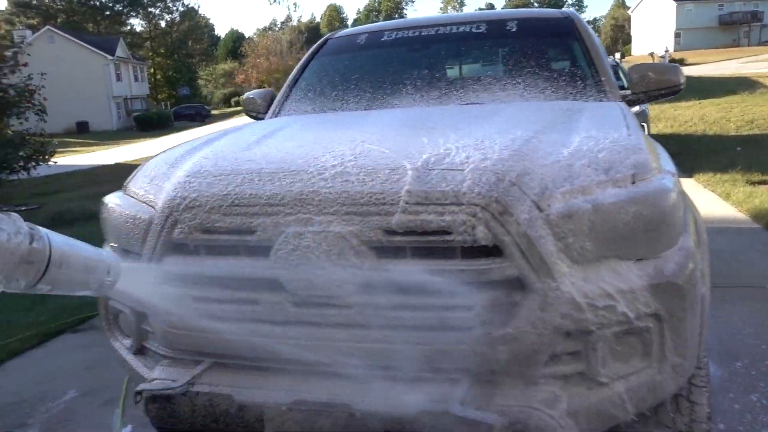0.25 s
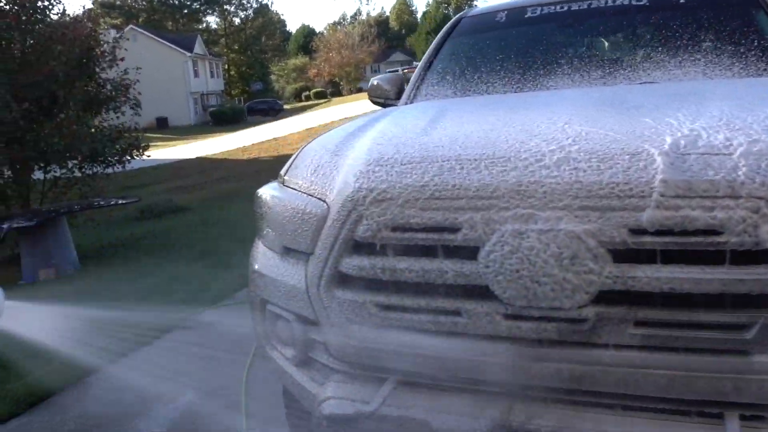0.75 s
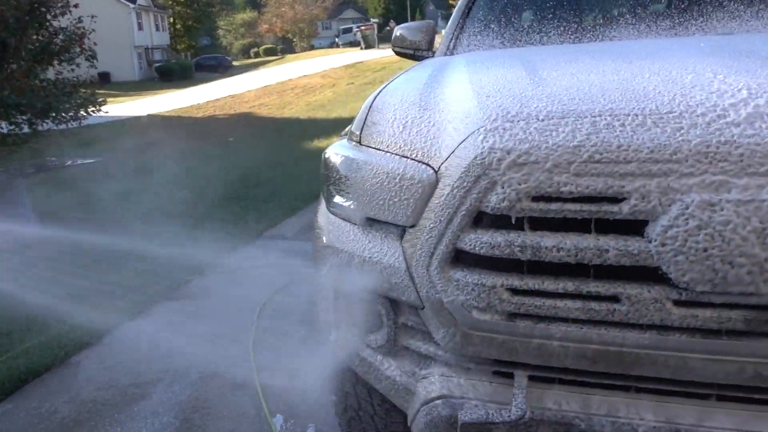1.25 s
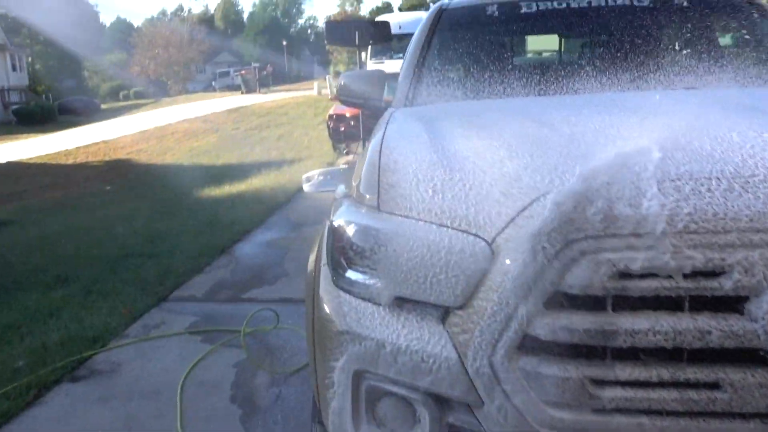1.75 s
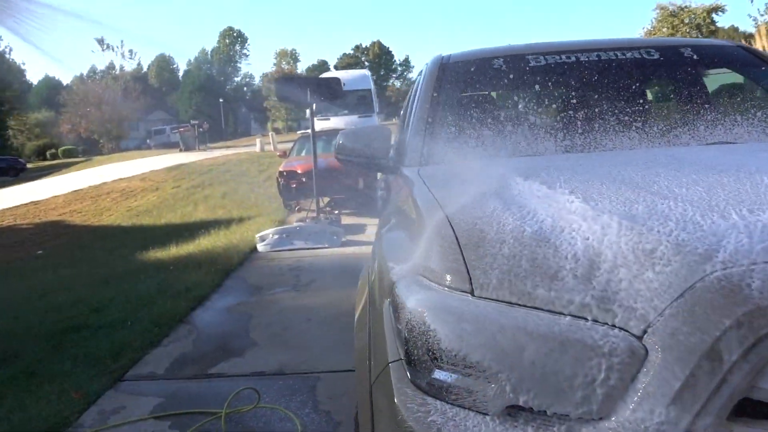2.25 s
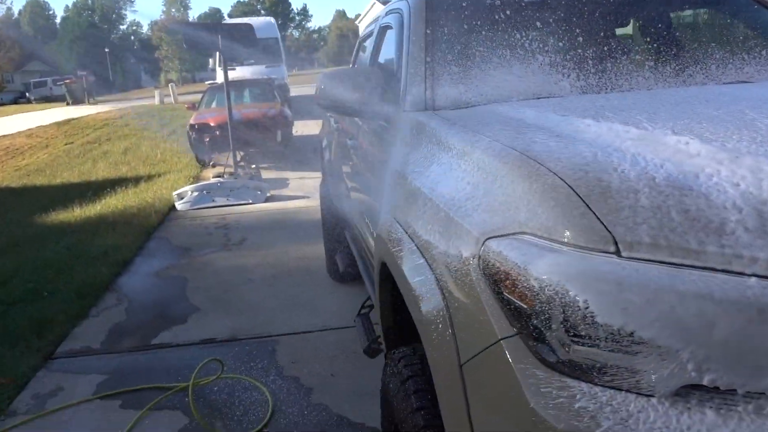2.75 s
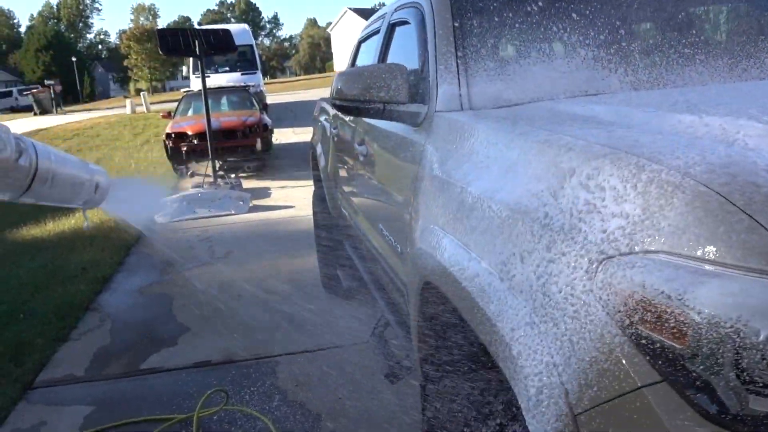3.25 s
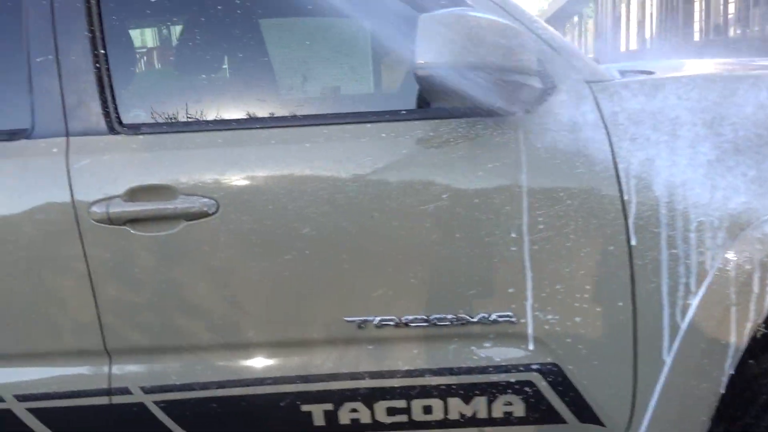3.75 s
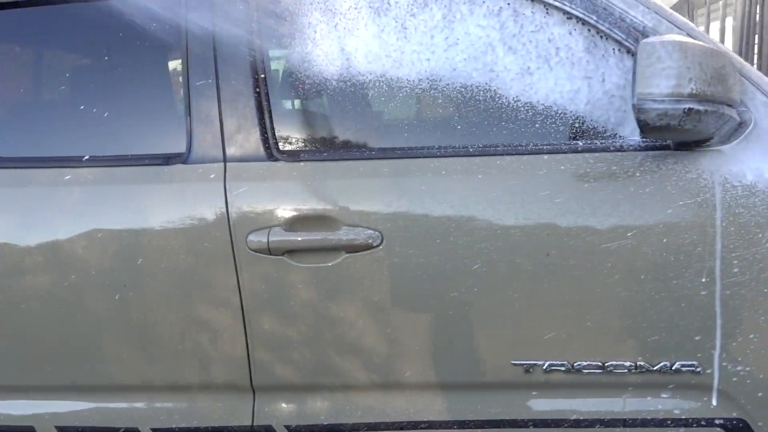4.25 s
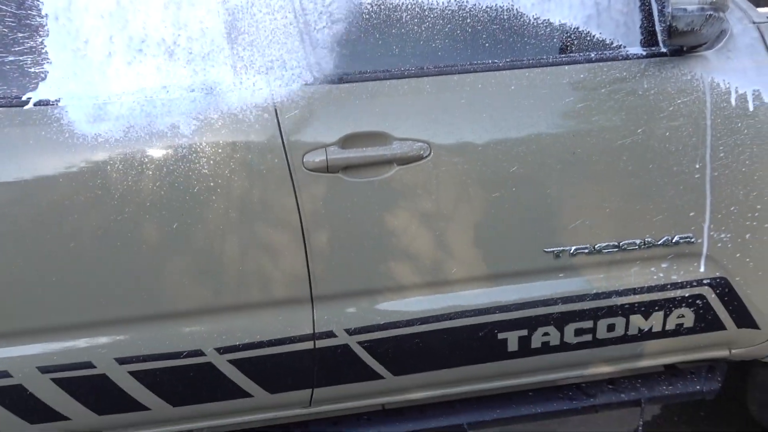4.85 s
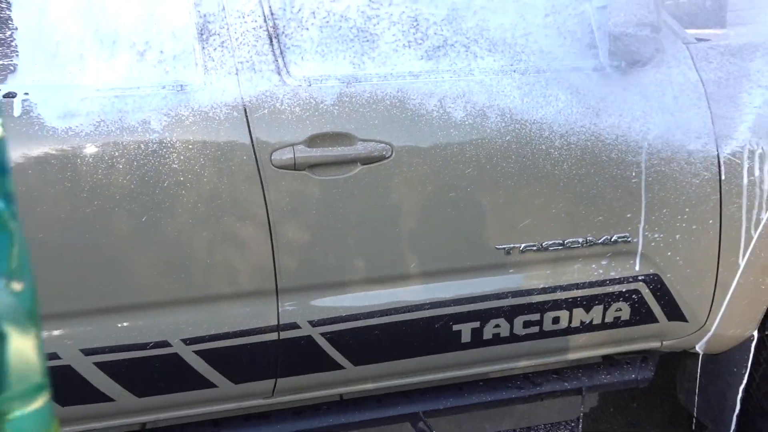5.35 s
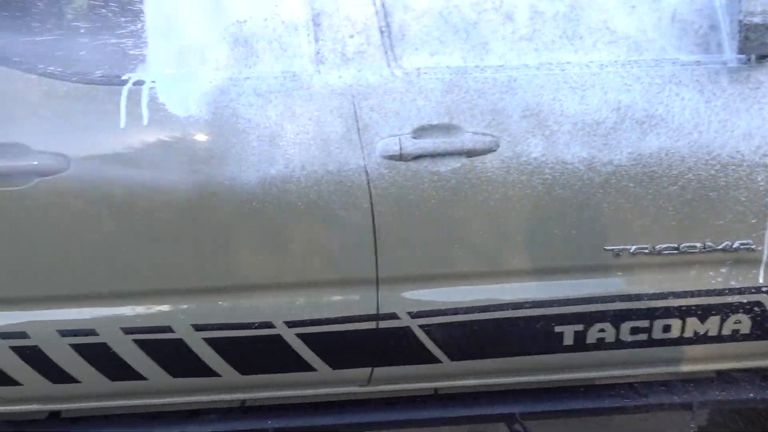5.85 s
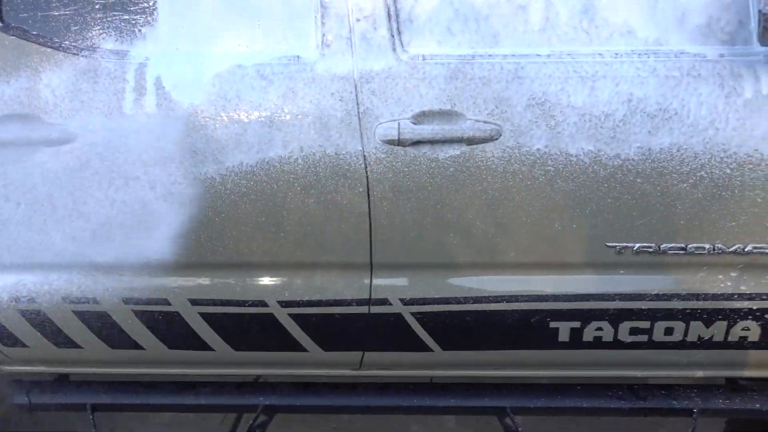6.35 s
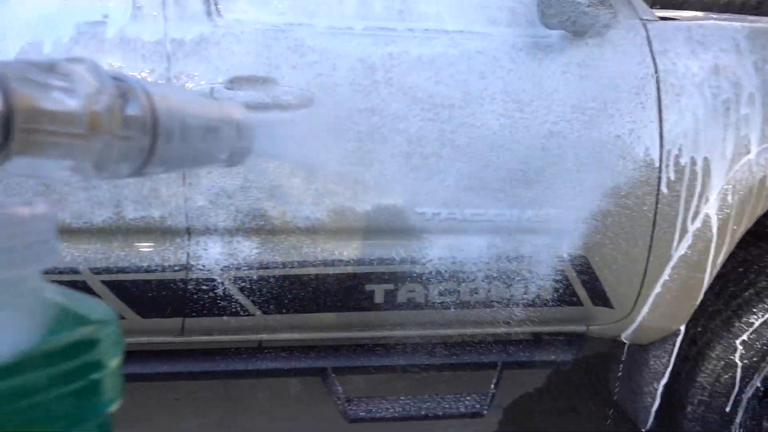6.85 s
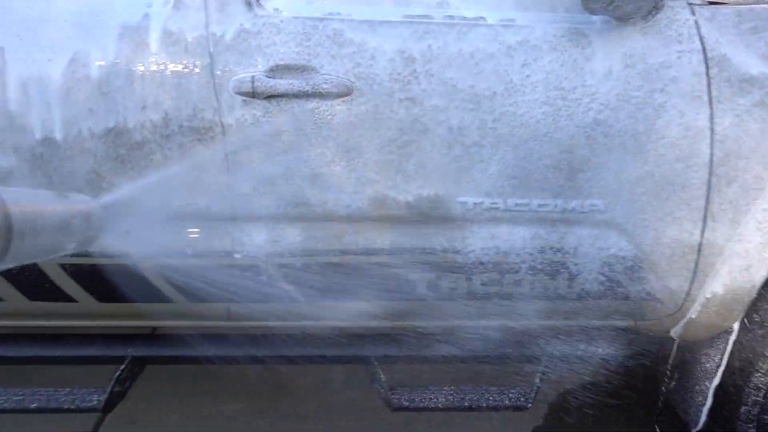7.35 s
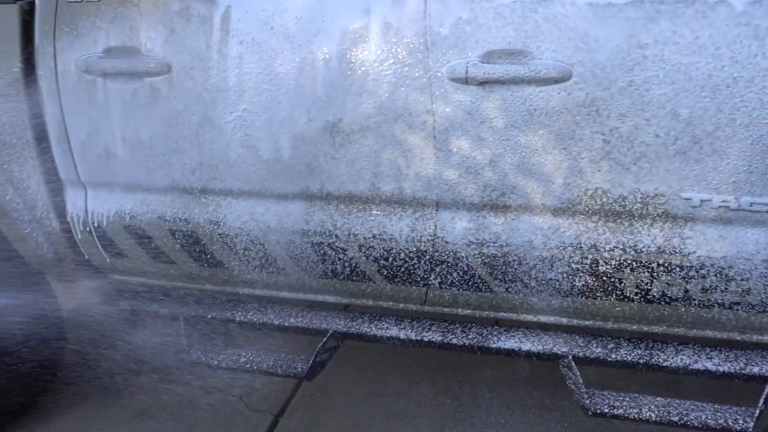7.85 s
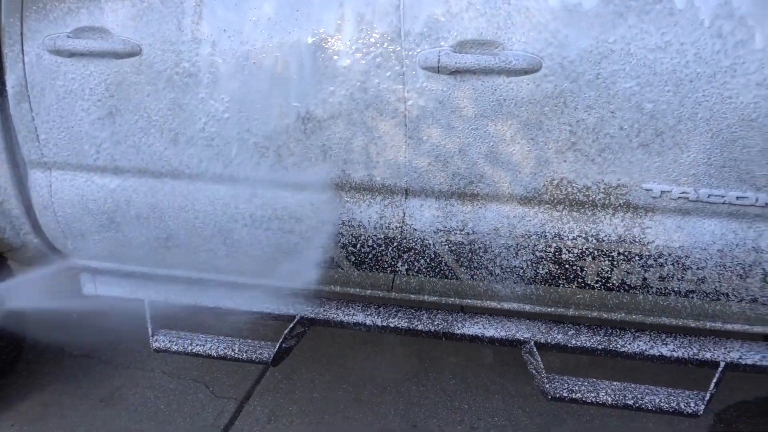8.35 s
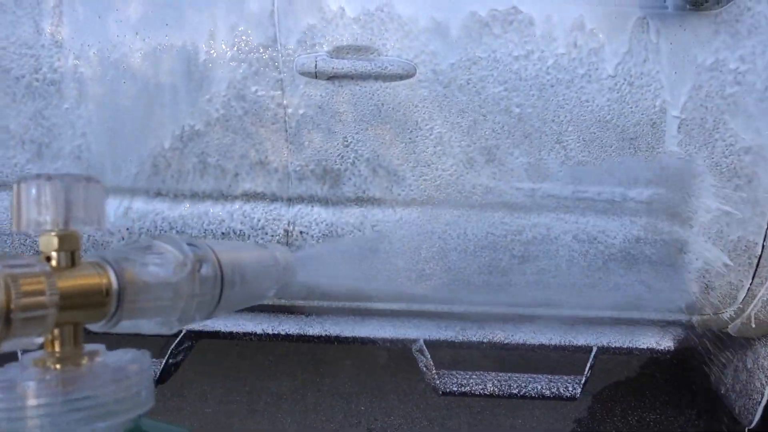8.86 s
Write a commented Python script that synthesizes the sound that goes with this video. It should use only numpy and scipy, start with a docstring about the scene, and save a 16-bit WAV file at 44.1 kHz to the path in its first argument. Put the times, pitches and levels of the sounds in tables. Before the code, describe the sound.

Steady broadband water hiss, textured with fine droplets and brief whistles, over the dull thudding drone of a one-cylinder pump engine. It starts moderate at the front of a vehicle, drops off as the engine speeds up, then jumps to a closer, fuller spray along its side with a clearer rattling motor. Hard exhaust cracks and crisp wet slaps come toward the end. Open yard, slight wall echo, stereo microphone near the operator.

```python
"""A petrol pressure washer sprays foam on a pickup, heard from the front and then from beside the doors.
From the start the jet hisses and sweeps (filtered drops) over the beat of a one-cylinder engine (timed thuds and tones).
From 2.9 s the trigger is let go: the hiss sinks and the engine races, until the spray returns close by at 3.5 s.
Then the jet works down the side; from about 6 s some sharp cracks (noise bursts) join the engine.
Near the end foam spatters (short ringing slaps) low on the truck."""
import sys
import numpy as np
from scipy import signal
from scipy.fft import rfft, irfft, next_fast_len
from scipy.io import wavfile
from scipy.ndimage import uniform_filter1d

SR = 44100
rng = np.random.default_rng(int(sys.argv[2]) if len(sys.argv) > 2 else 0)


def store_wav(level_fs):
    """Save 16-bit WAV to argv[1]."""
    pcm = np.round(np.clip(np.atleast_2d(level_fs), -1, 1) * 32767)
    wavfile.write(sys.argv[1], SR, pcm.T.astype(np.int16))


N = 401751
T = np.arange(N) / SR


def gain_of(db):
    """Turns decibels into a factor on the sound pressure."""
    return 10 ** (np.asarray(db) / 20)


def evened(x):
    """Scales to an rms of 1, so that levels can be set afterwards."""
    return x / np.sqrt(np.mean(abs(x) ** 2) + 1e-20)


def follow(table, t):
    """Reads every column of a table at the points t of its first column."""
    s, *columns = np.transpose(table)
    return [np.interp(t, s, c) for c in columns]


def read(points, hz):
    """Reads a spectrum at the frequencies hz, along a logarithmic pitch scale."""
    f, value = np.transpose(points)
    return np.interp(np.log(hz + 1), np.log(f + 1), value)


def colour(x, points, modes=()):
    """Causal filter of a smooth spectrum and resonances: each click rings after its arrival."""
    size = 8192
    hz = abs(np.fft.fftfreq(size, 1 / SR))
    db = read(points, hz)
    for centre, width, peak_db in modes:
        db = db + peak_db / (1 + ((hz - centre) / width) ** 2)
    minimum_phase = np.exp(signal.hilbert(np.log(gain_of(db))).conj())
    ring = np.fft.ifft(minimum_phase).real[:size // 2]
    return signal.oaconvolve(x, ring)[:N]


def sides(db):
    """Left and right gains of constant power for a left-right difference."""
    pair = np.array([gain_of(db / 2), gain_of(-db / 2)])
    return pair / np.sqrt((pair ** 2).mean(0))


# the two places of listening: from t/s, to t/s, t/s of one firing
PLACES = [(0, 3.5, 3.3204), (3.5, 9.2, 7.5345)]


def in_front(t):
    """True while we listen from the front of the truck."""
    return t < PLACES[1][0]


RELEASE_S, RUN_OUT_S = 2.88, 0.6


def pressure_lost(t):
    """Share of the water pressure lost (0-1) after the trigger is let go."""
    return np.clip((t - RELEASE_S) / RUN_OUT_S, 0, 1)


# the wand's turning points: t/s, aim (-1 right to 1 left)
TURNS = [(0, -0.7), (1.2, -0.046), (2.0, -0.35), (2.7, -0.1), (3.49, -0.69), (3.51, -0.98), (4.55, 0.7),
         (5.35, -0.65), (6.1, 0.62), (7.1, -0.79), (7.9, 0.21), (8.8, -0.64), (9.1, -0.48)]
EASE = 0.17  # how much the arm slows into each turn (0-1)


def aim(t):
    """Where the wand points: it swings between its turning points and slows into each."""
    s, side = np.transpose(TURNS)
    swings = np.interp(t, s, np.arange(len(s)))
    eased = swings - min(EASE, 1) * np.sin(2 * np.pi * swings) / (2 * np.pi)
    return np.interp(eased, np.arange(len(s)), side)


# engine speed, nearly steady but for a sag and a race after the release: t/s, firings per s
SPEED = [(0, 28.47), (2.89, 28.48), (2.93, 25.5), (3.01, 32.26), (3.49, 32.26), (3.51, 28.33), (6.3, 28.47),
         (7.5, 28.41), (9.11, 28.4)]


def firing_count():
    """Firings so far, as a smoothly growing number: the engine speed added up over time."""
    return np.cumsum(follow(SPEED, T)[0]) / SR


def yard(x, echo_ms, echo_db, scatter_db, t60=.15):
    """Direct sound, one wall echo and a short scatter off the truck and the drive."""
    t = T[:SR // 4]
    taps = rng.standard_normal(len(t)) * (rng.random(len(t)) < 2000 / SR)
    taps = taps * (t > .004) * gain_of(-60 * t / t60)
    size = next_fast_len(N + len(t))
    hz = np.fft.rfftfreq(size, 1 / SR)
    echo = gain_of(echo_db) * np.exp(-2j * np.pi * hz * echo_ms / 10 ** 3)
    scatter = gain_of(scatter_db) * rfft(taps / np.linalg.norm(taps), size)
    return irfft(rfft(x, size) * evened(1 + echo + scatter), size)[:N]


SHADOW_HZ = 410  # well below this both ears hear the engine equally loud


def both_ears(x, lead_ms, pan_db):
    """One ear hears first, and the shorter waves reach the two ears at different levels."""
    size = next_fast_len(N + SR // 4)
    hz, heard = np.fft.rfftfreq(size, 1 / SR), rfft(x, size)
    shadow = sides(pan_db * hz ** 2 / (hz ** 2 + SHADOW_HZ ** 2))
    late = heard * np.exp(-2j * np.pi * hz * lead_ms / 10 ** 3)
    return irfft(shadow * [heard, late], size)[:, :N]


# how openly the exhaust is heard past the truck: t/s, share of dry knock (0-1)
IN_VIEW = [(0, .15), (2.4, .2), (2.8, .45), (3.1, .5), (3.3, .63), (3.49, .63), (3.51, .3), (4.6, .35),
           (5.7, .45), (7.5, .52), (9.1, .56)]


def walk(x, echo_db=-9, delay_ms=5.5, wander_ms=1.3, wander_hz=.7):
    """The reflection off the truck's flank slowly lengthens and shortens, so the engine's tones wax and wane."""
    rates = wander_hz * np.geomspace(.2, 1, 6)
    wander = evened(np.sin(2 * np.pi * (rates * T[:, None] + rng.random(len(rates)))).sum(1))
    echo = np.interp(T - (delay_ms + wander_ms * wander) / 10 ** 3, T, x)
    strength = gain_of(echo_db) * np.sqrt(1 - follow(IN_VIEW, T)[0] ** 2)
    return (x + strength * echo) / np.hypot(1, strength)


# the engine from the front, then from the side, before swing and layer trims:
# t/s, thump level/dB, bark level/dB, clatter level/dB
ENGINE_LEVELS = ([(0, -48.5, -46, -37), (1.1, -55, -49, -41.5), (2.0, -56.5, -48.5, -42),
                 (2.8, -56, -41, -40), (3.02, -55, -49, -45), (3.21, -49, -45, -41),
                 (3.33, -41.5, -31.5, -34), (3.49, -43, -34, -40.5)], [(3.5, -43, -35.5, -24.5),
                 (5.0, -44, -35.5, -29.5), (6.2, -44, -33, -27), (7.5, -44.5, -32, -24),
                 (8.15, -43.5, -31.5, -22), (8.7, -47, -35, -30), (9.1, -46, -37, -31.5)])
# change at full left aim: thump level/dB, bark level/dB, clatter level/dB
ENGINE_SWING_DB = (4.5, 2, 2.5)
BOTTLE_S, BOTTLE_LENGTH_S, BOTTLE_DB = 5.29, 0.04, -9.5  # the foam bottle passes and shades the engine


def exposure(levels):
    """dB of thump, bark and clatter: they rise and fall with the arm's swing and dip behind the bottle."""
    left = aim(T)
    shade_db = BOTTLE_DB * np.exp(-((T - BOTTLE_S) / BOTTLE_LENGTH_S) ** 2)
    return [db + swing_db * left + shade_db for db, swing_db in zip(follow(levels, T), ENGINE_SWING_DB)]


def ping(firings, delay_ms, hz, length_ms):
    """A few swings of pressure around a set moment after each firing."""
    t = np.arange(-(SR // 30), SR // 30 + 1) / SR - delay_ms / 10 ** 3
    swing = np.cos(2 * np.pi * hz * t) * np.exp(-(t * 10 ** 3 / length_ms) ** 2)
    return evened(signal.oaconvolve(firings, swing, "same"))


# steady engine tones from the front, then from the side:
# multiple of the firing rate, level/dB against the engine layer it follows, before a random wobble
DRONES = ([(7, -11), (12, -5.5), (13, -4), (18, -9.5), (20, -10.5), (21, -9.5), (22, -14), (25, -12),
          (29, -14.5), (36, -16.5), (38, -19), (40, -22), (41, -20), (43, -20), (44, -18), (47, -13)],
          [(13, -4), (15, -11), (18, -20), (19, -13.5), (20, -11.5), (21, -15.5), (23, -19), (24, -10),
          (25, -18.5), (29, -11.5), (30, -15.5), (32, -23.5), (36, -20.5), (37, -13), (38, -18), (39, -20),
          (41, -30.5), (42, -14.5), (44, -24), (48, -21.5), (54, -25.5)])
THUMP_TOP_HZ, BARK_TOP_HZ = 480, 900  # tones follow the thump, the bark above that, then the clatter


def drone(turns, orders, levels, wobble_db=2.0):
    """Muffler and frame ring on in tones locked to the firings; they fade while the pump runs unloaded."""
    load = 1 - np.minimum(2 * pressure_lost(T), 1) * in_front(T)
    steps, out = np.arange(0, T[-1] + 1, 1 / 4), np.zeros(N)
    gains = [gain_of(level) for level in levels]
    for multiple, db in orders:
        multiple = round(multiple)
        layer = np.searchsorted([THUMP_TOP_HZ, BARK_TOP_HZ], multiple * SPEED[0][1])
        wobble = np.interp(T, steps, gain_of(db + wobble_db * rng.standard_normal(len(steps))))
        out += rng.choice([-1, 1]) * gains[layer] * wobble * np.sin(2 * np.pi * multiple * turns)
    return np.sqrt(2) * load * out


# moments when the exhaust cracks loudly: t/s, f/Hz, level/dB before a 3 dB lift and the burst's fade
CRACKS = [(6.06, 2820, -9), (6.096, 2800, -10), (6.168, 2600, -8), (7.817, 1490, -14), (7.995, 2600, -13),
          (8.065, 1000, -15), (8.206, 3300, -15), (8.24, 1880, -14), (8.31, 1090, -14), (8.346, 3700, -18),
          (8.452, 2490, -13), (8.486, 1804, -12), (8.874, 2000, -15)]


def cracks(width=.35, ring_s=.003, rise_s=.0004, lowest_hz=400):
    """Hard firings crack out of the exhaust: brief bursts of noise in one broad resonance."""
    out, t = np.zeros(N), T[:SR // 25]
    hz = np.fft.rfftfreq(len(t), 1 / SR)
    for s, pitch, db in CRACKS:
        band = gain_of(-10 * np.log10(1 + (np.log((hz + 1) / pitch) / width) ** 4))
        noise = evened(irfft(rfft(rng.standard_normal(len(t))) * band, len(t)))
        burst = np.tanh(noise) * np.exp(-t / ring_s) * (1 - np.exp(-t / rise_s))
        part = out[round(s * SR):][:len(t)]
        part += gain_of(db + 3) * burst[:len(part)]
    return signal.sosfilt(signal.butter(4, lowest_hz, "high", fs=SR, output="sos"), out)


# tone colour of the low thump: f/Hz, relative level/dB
THUMP = [(25, -50), (60, -30), (110, -23), (142, -0.5), (190, -9), (230, -9), (275, -6), (370, -2.5),
         (450, -10), (700, -8), (2000, -62)]
# tone colour of the rattling parts: f/Hz, relative level/dB
CLATTER = [(25, -99), (500, -27.5), (965, -4.5), (1045, -3.5), (1200, 5), (1350, 1.5), (1600, 12),
           (2100, -4), (4000, -4), (12000, -56)]
# tone colour of the crack in each firing: f/Hz, relative level/dB
CRACK = [(25, -73), (500, -8), (1100, 6), (1900, -10), (3200, -4), (4500, -22), (12000, -33)]
# the exhaust's bark from the front, then from the side: f/Hz, relative level/dB
BARKS = ([(25, -48), (200, -33), (310, -18.5), (440, 4), (530, -3.5), (630, -7), (760, 0.5), (950, 4),
         (1500, -28), (4000, -48)], [(25, -56), (250, -29), (430, -1.5), (530, 3.5), (630, 5), (720, -2),
         (830, 9), (950, -9.5), (1500, -32), (4000, -55)])
# resonances of the muffler and the engine's frame: f/Hz, half-width/Hz, level/dB
MUFFLER = [(196, 31, 8.5), (273, 21, 17), (386, 32, 7.5), (524, 75, 8), (604, 63, 6), (688, 19, 10.5),
           (833, 18, 12), (1047, 20, 13), (1194, 25, 6), (1562, 29, -15)]
# bare exhaust puff, front then side: delay after firing/ms, f/Hz, length/ms, share of the valves heard (0-1)
KNOCKS = [(1.7, 530, 1.6, 0), (1.964, 640, 1.68, 0.98)]
# the valve gear rings twice in each cycle: delay after firing/ms, f/Hz, length/ms, level/dB within the clatter
VALVES = [(3.953, 1100, 0.86, -2), (21.21, 1123, 2.7, -7)]
# how the engine reaches us, front then side: left ear's lead/ms, left-right level/dB,
# wall echo delay/ms, echo level/dB, scatter level/dB
PATHS = [(0, 4, 7.5, -19, -11.5), (-.1, -3.6, 11.1, -6.5, -15)]
UNEVEN_DB = 1.0  # random spread from one firing to the next


def engine(first_firing, bark_colour, knock, levels, orders, path, thump_db=2.0, bark_db=1.0, muffled_db=-3,
           clatter_db=-2.5, rattling_db=-2, crack_db=-10, crack_spread_db=1.5, puff=0.68, loose=0.45):
    """Each firing thumps, barks and cracks a little; valves and pump clatter nearly alike in every cycle."""
    turns = firing_count()
    turns = turns - np.interp(first_firing, T, turns)
    phase = turns % 1
    number = (np.floor(turns) - np.floor(turns[0])).astype(int)
    # each firing draws its own character
    strength, sharpness, seating = np.clip(rng.standard_normal((number[-1] + 1, 3)), -2, 2)[number].T
    firings = evened(np.diff(number, prepend=0) * gain_of(UNEVEN_DB * strength))
    gas = evened(np.exp(-phase / 0.45) * rng.standard_normal(N))
    burst_shape = np.exp(-((phase - .125) / 0.066) ** 2) * gain_of(crack_spread_db * sharpness)
    burst = evened(burst_shape * rng.standard_normal(N))
    # one cycle of many small knocks, equally strong at every multiple of the firing rate
    cycle = irfft(np.exp(2j * np.pi * rng.random(SR // 56)))
    knocks = evened(cycle[(phase * (len(cycle) - 1)).astype(int)] * (1 + 1.2 * np.exp(-phase / 0.98)))
    slack = evened(rng.standard_normal(N) * (0.29 + np.exp(-phase / 0.4)))
    thump_level, bark_level, clatter_level = heard = exposure(levels)
    thump = gain_of(thump_level + thump_db) * evened(colour(firings + 0.044 * gas, THUMP, MUFFLER))
    # the bark blends a muffled and a bare sound of the exhaust
    muffled = gain_of(muffled_db) * evened(colour(firings + puff * gas, bark_colour, MUFFLER))
    share = np.clip(follow(IN_VIEW, T)[0], 0, 1)
    knock_ms, knock_hz, length_ms, valves_heard = knock
    bare = ping(firings, knock_ms, knock_hz, length_ms)
    bark = gain_of(bark_level + bark_db) * (np.sqrt(1 - share ** 2) * muffled + share * bare)
    # the clatter blends loose rattling with the valves
    rattling = evened(colour(knocks + loose * slack + 0.43 * firings, CLATTER, MUFFLER))
    rattling = gain_of(rattling_db) * rattling
    valves = sum(gain_of(db) * ping(firings * gain_of(UNEVEN_DB * seating), *valve) for *valve, db in VALVES)
    valve_share = share * np.clip(valves_heard, 0, 1)
    clatter = np.sqrt(1 - valve_share ** 2) * rattling + valve_share * valves
    clatter = gain_of(clatter_level + clatter_db) * clatter
    crack = gain_of(clatter_level + crack_db) * evened(colour(burst, CRACK))
    tones = drone(turns - knock_ms / 10 ** 3 * SPEED[0][1], orders, heard)
    # thump and bark push the air the opposite way
    body = yard(walk(clatter + crack - thump - bark), *path[2:])
    return both_ears(body + tones, *path[:2])


# the spot the jet strikes: t/s, height/m
HEIGHT = [(0, 0.9), (1.3, 0.79), (2.0, 1.5), (2.8, 1.08), (3.08, 1.8), (3.33, 0.94), (3.49, 0.68),
          (3.51, 1.85), (4.5, 1.8), (5.1, 1.17), (5.8, 1.25), (6.3, 0.94), (7.05, 0.78), (7.45, 0.59),
          (7.95, 0.46), (8.35, 0.4)]
# how step, sill, lower door, door, window and roof line answer the jet, before the rules and trims:
# height/m, splash level/dB, jet level/dB, mist level/dB, sputter (0-1), jet left-right level/dB,
# mist left-right level/dB before the aim scales it
SURFACES = [(.35, -34.5, -34, -33, .6, 4, 5), (.45, -27, -31, -39, .6, 7, 3),
            (.6, -20.5, -25, -36.5, 0.5, 13, 5), (.85, -24.5, -20, -29.5, 0.12, 8, 6),
            (1.35, -24, -20.5, -22, 0.4, 7, -4), (1.7, -25, -20, -23.5, 0.2, 4, 0)]


def surface(t):
    """The traits of the part of the truck that the jet is striking."""
    return follow(SURFACES, follow(HEIGHT, t)[0])


def spatter(level_db=-39, per_s=110, low_hz=2300, high_hz=5000, ring_s=0.0017, spread_db=5.0, below_m=0.73,
            count=16):
    """Low on the truck the jet breaks up: gobs of foam slap down, each ringing briefly at one of a set of pitches."""
    depth = np.clip((below_m - follow(HEIGHT, T)[0]) * 10, 0, 1)
    low = depth * gain_of(surface(T)[0] - SURFACES[2][1])  # against the splash of the lower door
    t, out = T[:SR // 50], np.zeros((2, N))
    for hz in np.geomspace(low_hz, high_hz, count):
        sizes = gain_of(spread_db * np.minimum(rng.exponential(1, N), 2))
        gobs = (rng.random(N) < per_s / count / SR) * sizes
        slap = signal.oaconvolve(gobs, np.sin(2 * np.pi * hz * t) * t * np.exp(-t / ring_s))[:N]
        out += sides(rng.uniform(-2, 10))[:, None] * slap
    return gain_of(level_db) * low * evened(out)


OPENING_S = 0.36  # time scale on which the opening splash fades and the jet and mist fill in


def reach(t, swing_db, front_db, opening_db, walk_db_per_s, run_out_db):
    """dB change of a spray layer: it follows the swing; from the front also distance and pressure count."""
    run_out = pressure_lost(t) ** 2
    front = front_db + opening_db * np.exp(-t / OPENING_S) + walk_db_per_s * t + run_out_db * run_out
    return swing_db * aim(t) + front * in_front(t)


def patches(shape, size):
    """Smooth random patches over time frames and frequency bins."""
    field = rng.standard_normal(shape)
    for axis in (0, 1, 0, 1):
        field = uniform_filter1d(field, size[axis], axis)
    return evened(field)


def droplets(sputter, per_s=700, spread_db=4.5, share=0.3):
    """Short-time spectra of countless tiny drops, with more of the larger splats where the spray sputters."""
    arrivals = (rng.random(N) < per_s / SR) * rng.choice([-1, 1], N)
    splats = arrivals * gain_of(spread_db * np.minimum(rng.exponential(1, N), 3.2))
    rain = evened(rng.standard_normal(N) + share * (0.66 + sputter) * evened(splats))
    return signal.stft(rain, nperseg=512, noverlap=384)[2].T


# tone colour of water splashing on the panels: f/Hz, relative level/dB
SPLASH = [(30, -58), (80, -42), (160, -17), (300, -16), (600, -6.5), (800, -2.5), (1150, -1), (1650, 3),
          (2100, 2), (2700, 5), (3300, 1), (5000, -4), (16000, -52)]
# tone colour of the jet: f/Hz, relative level/dB
JET = [(30, -61), (1200, -16), (2400, -6.5), (3300, 2.5), (3950, -1), (4800, 2), (6300, 1), (7300, 1),
       (8600, -6.5), (11000, -14), (16000, -38)]
# tone colour of the fine mist: f/Hz, relative level/dB
MIST = [(30, -58), (3000, -11), (7000, 3), (8600, 0), (9800, 1.5), (11500, 0.5), (13500, 0), (15000, -8),
        (16000, -7)]
# likeness of the two ears: f/Hz, likeness (0-1)
SAME = [(30, 1), (600, 1), (1400, 0.28), (2600, 0.45), (4000, 0.66), (5500, 0.33), (7500, 1), (10000, 0.31),
        (16000, 1)]
# how splash, jet and mist change: level/dB at full left aim, then from the front only: level/dB,
# level change/dB at the start, fading within about a second (splash louder, jet and mist softer),
# dB per s on the walk, level/dB once the pressure has run out
SPLASH_RULE = (2, -12, 6.5, -0.5, -1)
JET_RULE = (-2, -13.5, -2.5, -0.3, -11.5)
MIST_RULE = (0.5, -2.5, -6.5, -7, 6)
# resonance of the hiss, sliding as the jet's angle to the panel changes: t/s, f/Hz, level/dB
RING = [(0, 4660, 5.5), (.8, 4850, -1), (1.3, 4520, 1.5), (2.0, 4930, 2), (2.5, 4670, 5), (2.95, 4930, 2),
        (3.49, 4900, 4), (3.7, 5340, 3.5), (4.4, 5870, 1.5), (4.75, 5200, -1), (5.1, 4940, 3.5),
        (5.4, 5480, 3.5), (5.7, 5500, 5.5), (6.05, 4560, 6), (6.45, 4750, 2.5), (6.85, 4230, 4),
        (7.25, 4340, 0), (7.5, 3540, 5.5), (8.0, 4300, 7.5), (9.1, 4400, 1.5)]
RING_WIDTH, NOTCH_ABOVE, NOTCH_SHARE = 0.12, 1.32, 0.098  # a weaker notch slides along above it
# the jet catches an edge and whistles: t/s, f/Hz, glide/(Hz per s), length/s, level/dB before random flicker
WHISTLES = [(.083, 2500, 800.5, 0.06, 12), (0.212, 8580, 0, 0.064, 14), (0.334, 2520, 600, 0.092, 11),
            (.3, 4050, 8, 0.16, 7.5), (.3, 3200, 0, 0.36, 3), (0.423, 4980, 0, 0.05, 9),
            (1.065, 3670, 0, 0.039, 11), (1.2, 4400, -900, 0.15, 10), (1.252, 3560, -900, 0.088, 9),
            (1.326, 2570, 4, 0.027, 13), (3.13, 5980, 800, 0.13, 14), (3.1, 4930, 0, .13, 5),
            (3.184, 1500, -2, 0.27, 12.5), (3.258, 3610, 0, 0.06, 18), (3.325, 4340, -1500, 0.085, 14),
            (3.57, 7150, 0, 0.13, 4), (5.302, 3360, 6, 0.054, 7.5), (6.397, 5270, -2600, 0.13, 7),
            (7.207, 4730, 6, 0.12, 9), (7.422, 4900, 2, 0.045, 2), (8.74, 4370, -1500, 0.041, 8)]
WHISTLE_WIDTH_HZ = 150
LEAD_MS, SWING_MS = 0.06, 0.047  # the left ear hears the spray first, the more so as the wand aims left
JET_SWING_PAN_DB = -1  # change of the jet's left-right difference at full left aim


def spray(splash_db=-1.0, jet_db=0., mist_db=2.5, patch_db=5.0, flutter_db=2.1, pump_depth=0.046):
    """Splash, jet and mist share one stream of drops, which reaches the ears at different times as the wand sweeps."""
    *_, sputter, _, _ = surface(T)
    near, apart = droplets(sputter), droplets(sputter)
    t, hz = np.arange(len(near))[:, None] * 128 / SR, np.fft.rfftfreq(512, 1 / SR)
    splash_level, jet_level, mist_level, rough, jet_pan_db, mist_pan_db = surface(t)
    left = aim(t)
    pitch, ring_db = follow(RING, t)
    peak, notch = (np.exp(-(np.log((hz + 1) / centre) / RING_WIDTH) ** 2)
                   for centre in (pitch, pitch * NOTCH_ABOVE))
    ring = ring_db * (peak - NOTCH_SHARE * notch)

    splash = gain_of(splash_level + reach(t, *SPLASH_RULE) + splash_db) * evened(gain_of(read(SPLASH, hz)))
    splash = splash * sides(np.where(in_front(t), 4.5, -.8))
    jet = gain_of(jet_level + reach(t, *JET_RULE) + jet_db) * evened(gain_of(read(JET, hz) + ring))
    jet = jet * sides(jet_pan_db + JET_SWING_PAN_DB * left)
    mist = gain_of(mist_level + reach(t, *MIST_RULE) + mist_db) * evened(gain_of(read(MIST, hz)))
    mist = mist * sides(mist_pan_db * np.maximum(.25 - left, 0))  # aiming right pulls the mist to one side
    layers = np.sqrt(splash ** 2 + jet ** 2 + mist ** 2)

    # gaps and edges ring for a moment as the jet crosses them
    field_db = patch_db * rough * patches(near.shape, size=(9, 3))
    field_db = field_db + flutter_db * rough * patches(near.shape, size=(4, 60))
    field_db = field_db - np.log(10) / 20 * (patch_db * rough) ** 2  # the narrow patches keep the mean power
    field_db = field_db + 1.0 * patches(near.shape, size=(90, 3))  # reflections off the body drift slowly
    grip = 1 + .3 * patches(near.shape, size=(4, 3))  # whistles flicker
    for s, whistle_hz, glide, length, db in WHISTLES:
        off_pitch = (hz - whistle_hz - glide * (t - s)) / WHISTLE_WIDTH_HZ
        field_db = field_db + grip * db * np.exp(-((t - s) / length) ** 2 - off_pitch ** 2)

    same = np.clip(read(SAME, hz), 0, 1)
    lead_ms = LEAD_MS + SWING_MS * left
    right = (same * near + np.sqrt(1 - same ** 2) * apart) * np.exp(-2j * np.pi * hz * lead_ms / 10 ** 3)
    spectra = np.array([near, right]) * layers * gain_of(field_db)
    sound = signal.istft(spectra.swapaxes(1, 2), nperseg=512, noverlap=384)[1][:, :N]
    # each firing and the pump's strokes ripple the pressure
    cycle = 2 * np.pi * firing_count()
    return sound * (1 + pump_depth * (np.sin(cycle) + 0.76 * np.sin(4 * cycle)))


def scene():
    """The engine as heard from each place in turn, its loudest cracks, the spatter and the spray."""
    motor = np.zeros((2, N))
    for (start, end, firing), *traits in zip(PLACES, BARKS, KNOCKS, ENGINE_LEVELS, DRONES, PATHS):
        motor += engine(firing, *traits) * ((T >= start) & (T < end))
    side = PATHS[1]
    loud_cracks = both_ears(yard(cracks(), *side[2:]), *side[:2])
    return motor + loud_cracks + spatter() + spray()


# the level dips briefly between the places: t/s, gain
DIP = [(0, 1), (3.488, 1), (3.499, .15), (3.503, .04), (3.53, 1), (9.11, 1)]
EDGE_HZ = 15850  # top of the treble


def record(dry):
    """The brief dip in level, then a low-pass filter that takes off the highest treble."""
    low_pass = signal.firwin(511, EDGE_HZ, window=("kaiser", 9), fs=SR)
    return signal.oaconvolve(dry * follow(DIP, T)[0], low_pass[None], "same")


dry = scene()
out = record(dry)
store_wav(out)
```